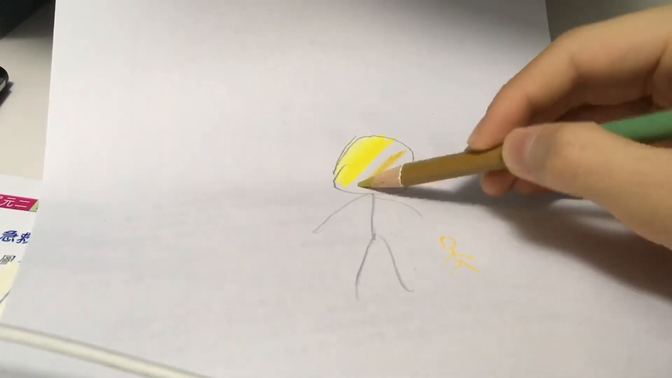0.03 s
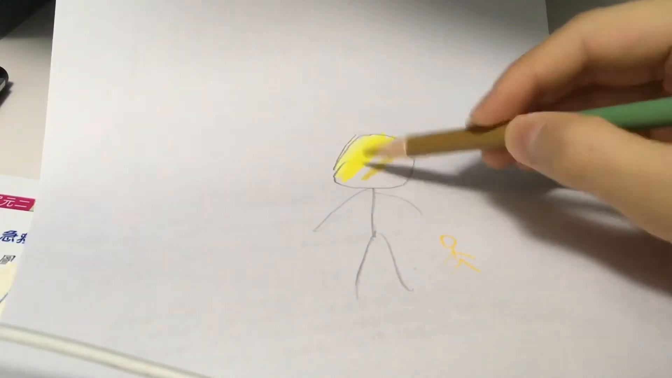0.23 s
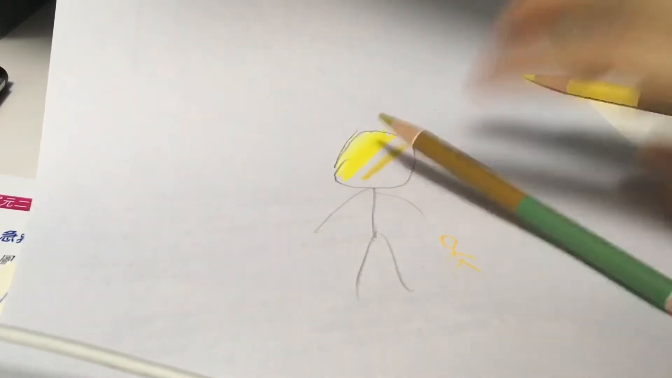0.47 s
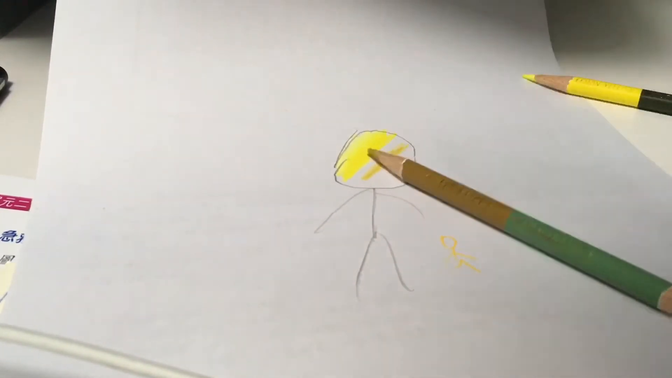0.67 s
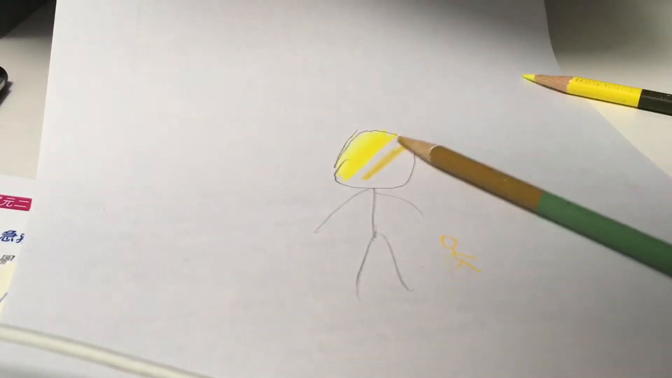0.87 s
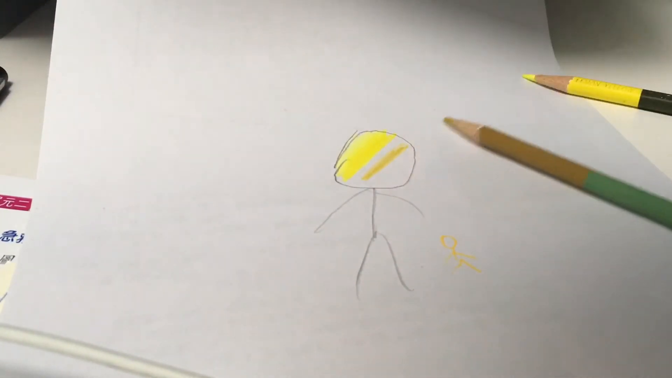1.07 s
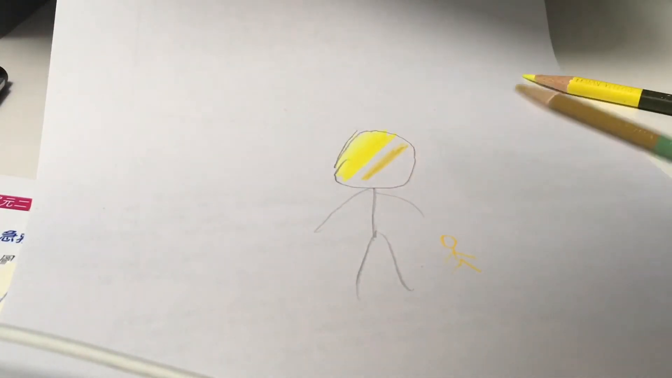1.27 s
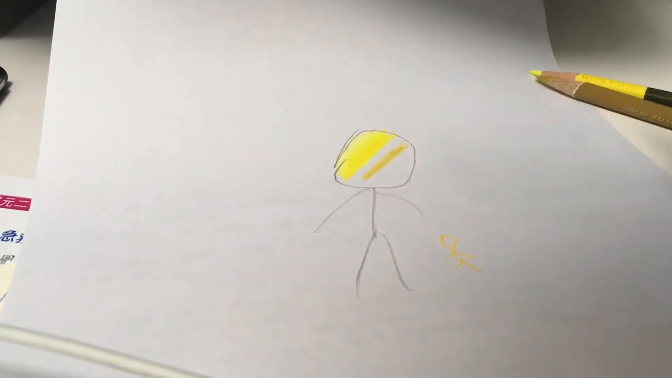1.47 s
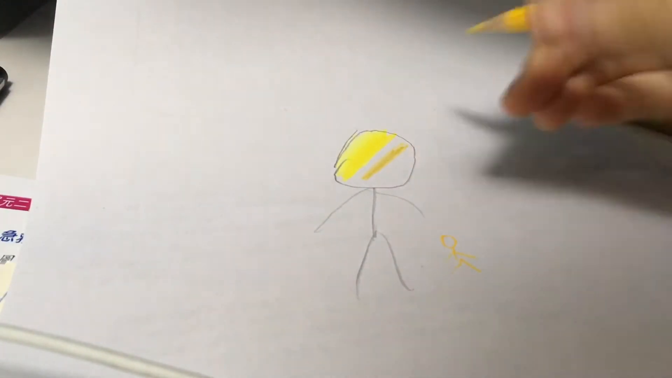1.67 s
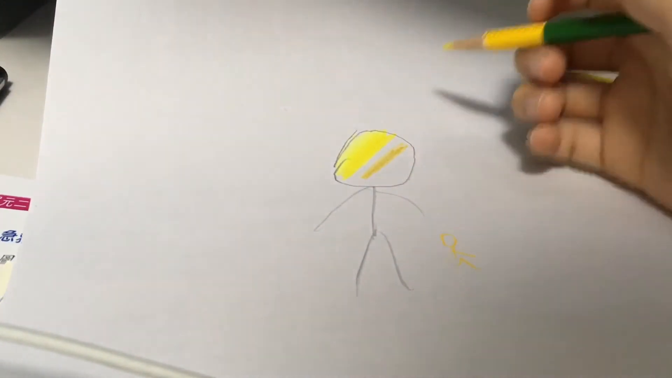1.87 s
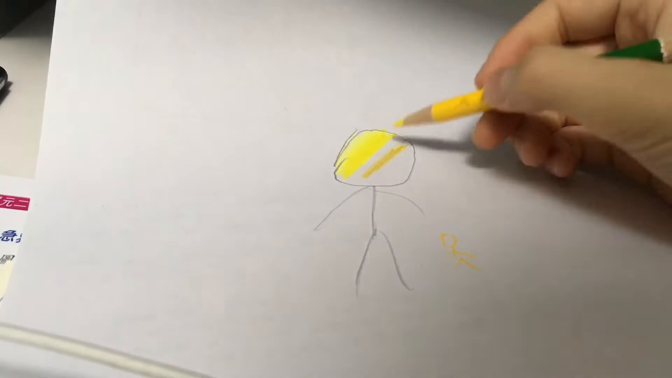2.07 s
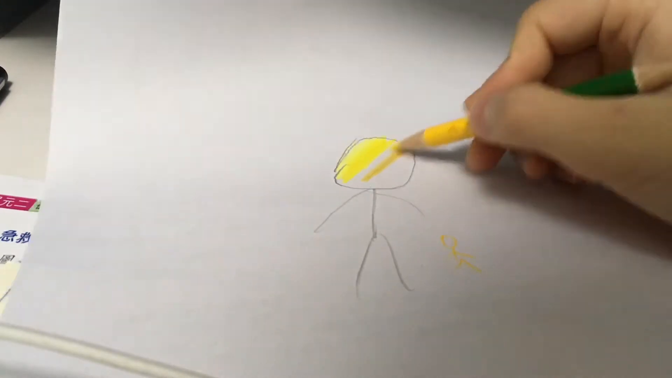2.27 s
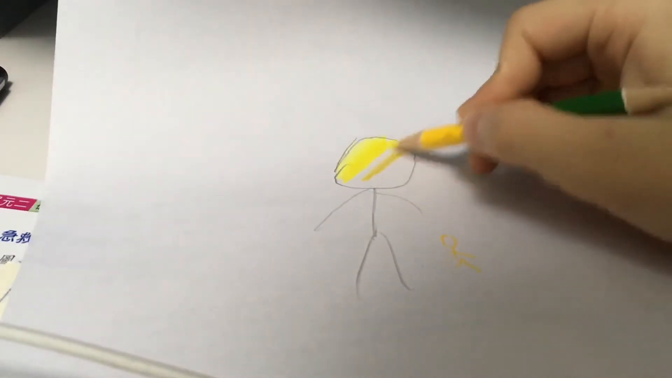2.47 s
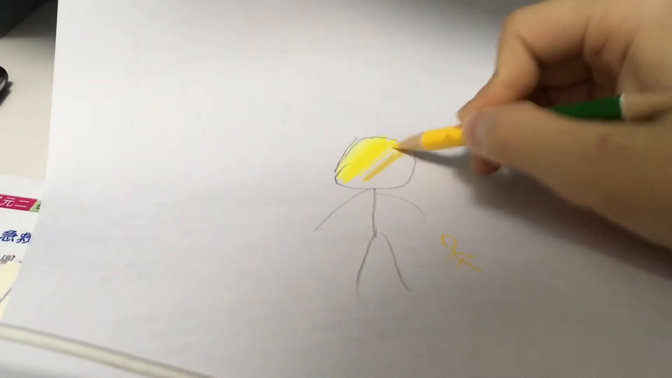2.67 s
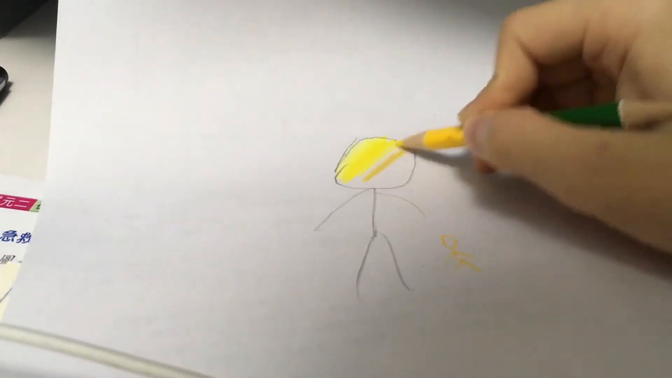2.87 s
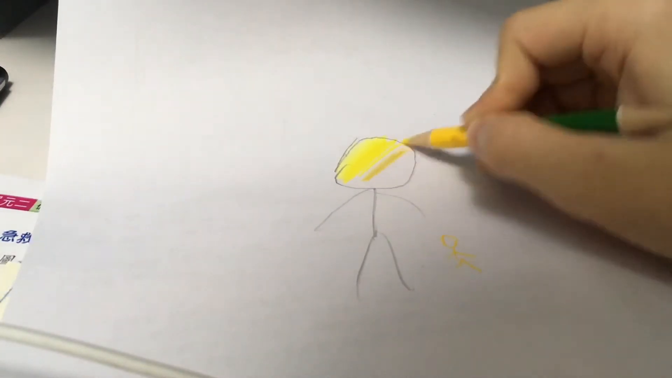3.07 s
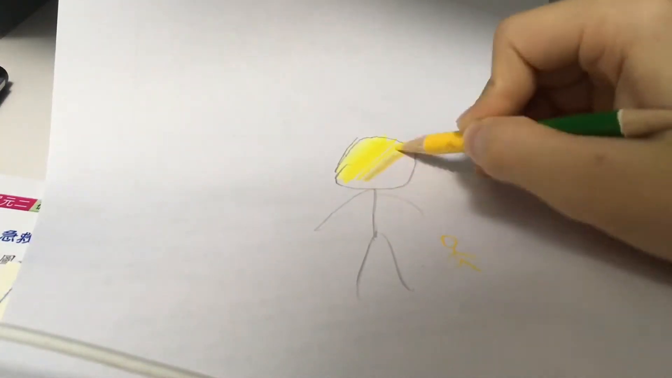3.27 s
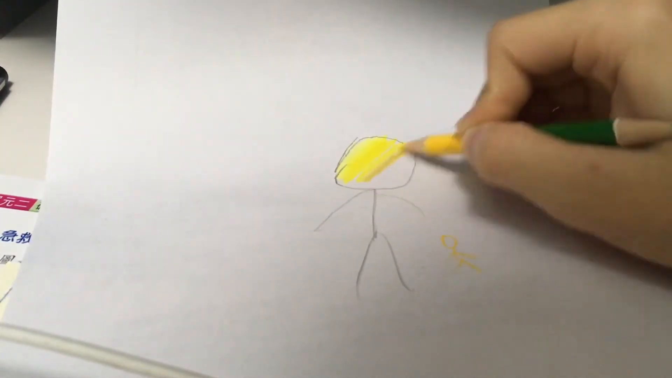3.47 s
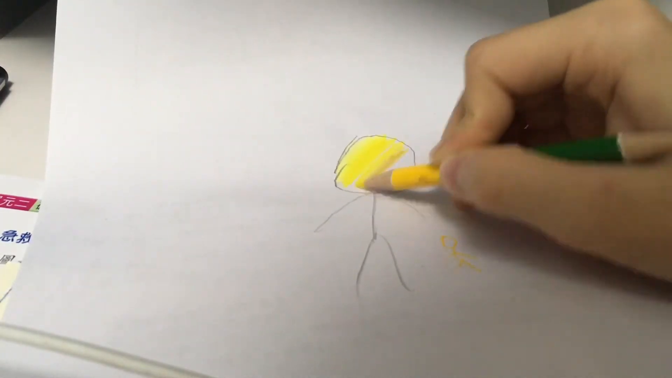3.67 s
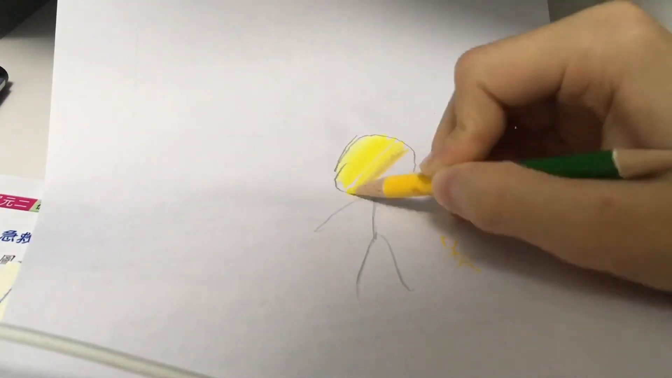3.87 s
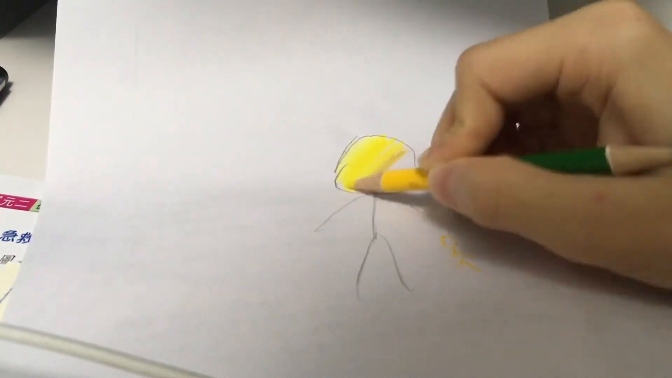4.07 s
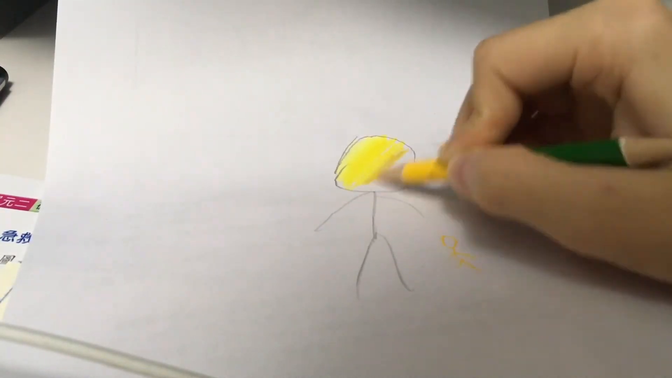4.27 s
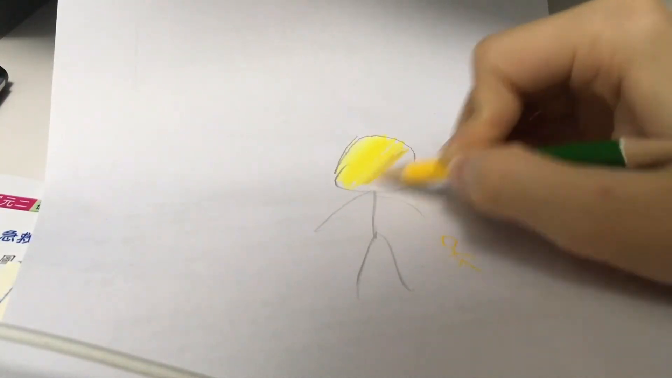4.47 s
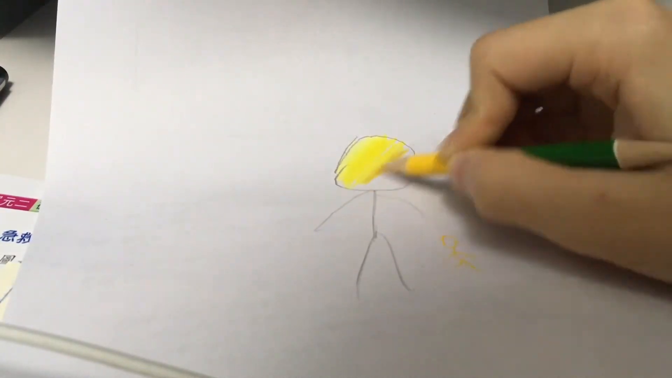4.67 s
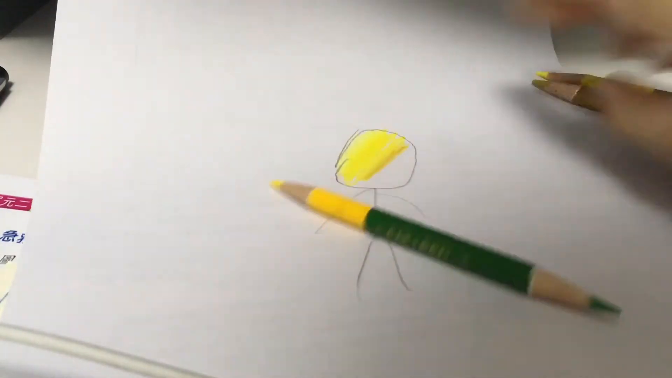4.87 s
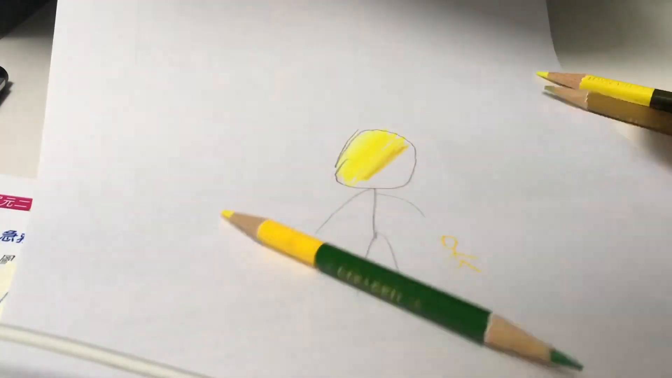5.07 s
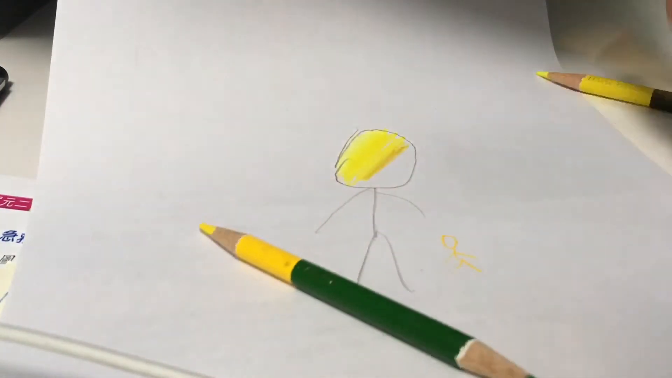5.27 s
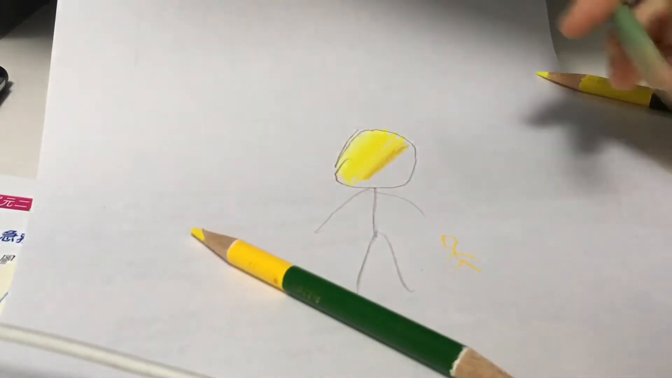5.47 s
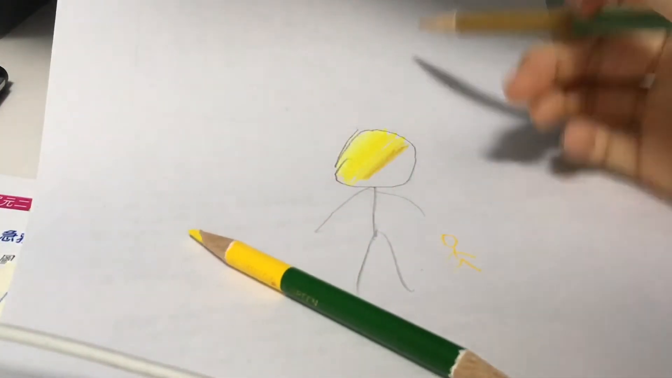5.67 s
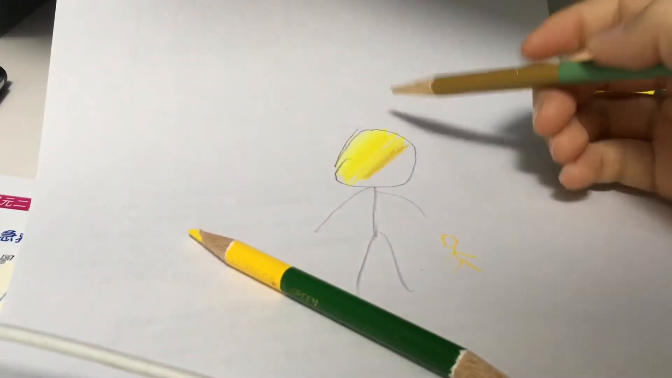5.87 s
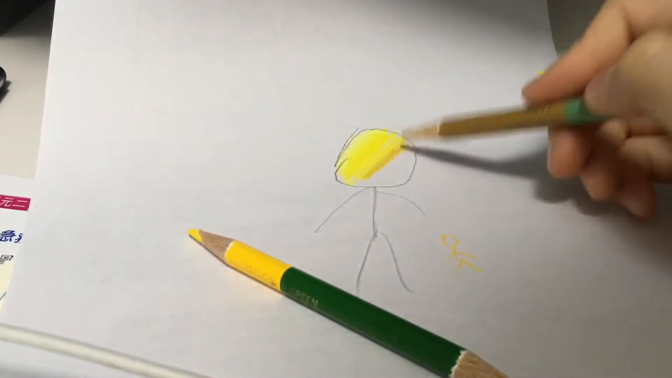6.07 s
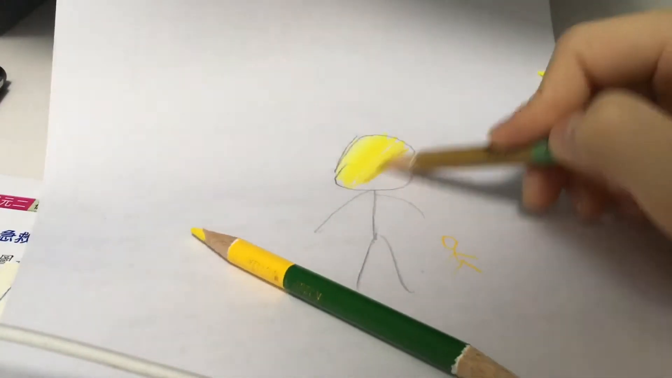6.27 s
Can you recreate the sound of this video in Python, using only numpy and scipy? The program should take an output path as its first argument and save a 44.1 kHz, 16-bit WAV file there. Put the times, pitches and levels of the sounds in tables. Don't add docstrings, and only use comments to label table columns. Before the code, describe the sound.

Brief pencil flicks, hard wooden clacks and rolling, brisk back-and-forth colouring strokes, then another pencil clatter and two final rubs, above dull room hum.

```python
import sys
import numpy as np
from scipy import signal
from scipy.fft import rfft, irfft, next_fast_len
from scipy.io import wavfile

SR = 44100
rng = np.random.default_rng(int(sys.argv[2]) if len(sys.argv) > 2 else 0)


def wav_record(signal):
    frames = np.transpose(np.atleast_2d(signal))
    bounded = np.clip(frames, -1, 1)
    quanta = np.round(bounded * 32767).astype(np.int16)
    wavfile.write(sys.argv[1], SR, quanta)


def convert_level_to_amplitude(level_db):
    exponent = np.asarray(level_db, float) / 20
    return 10 ** exponent


N = 278922

# (frequency [Hz], density [dB per Hz])
RUMBLE = [(15, -62), (25, -51), (40, -16), (53, -12), (108, -3.5), (195, -1.5), (217, -4.5), (238, -11.5),
          (282, -5), (324, -23), (448, -25), (477, -30.5), (565, -38.5), (659, -32.5), (1000, -59),
          (1300, -100), (2200, -120)]
# (frequency [Hz], density [dB per Hz])
ROOM_HISS = [(470, -46.5), (800, -7.5), (1190, -0.5), (1660, -7), (2290, -8), (3140, -13.5), (7360, -18),
             (9100, -22.5), (13900, -28.5), (16000, -54)]
# (frequency [Hz], density [dB per Hz])
SKIN = [(1530, -58.5), (2600, -4), (4460, 0.5), (5230, -2), (5690, 1.5), (6190, -3.5), (9120, 2),
        (16000, -15)]
# (start [s], length [s], hiss [dB], body over hiss [dB])
SLIDES = [(0.21, 0.082, -75.5, 8), (0.26, 0.047, -67.5, -3), (0.295, 0.098, -73.5, 5),
          (0.36, 0.11, -57.5, 0), (0.51, 0.037, -62.5, 14.5), (0.56, 0.21, -76, -2), (1.45, 0.014, -72, -1),
          (1.56, 0.022, -76, -16), (1.785, 0.051, -69, 5.5), (1.94, 0.13, -82, 8.5),
          (2.225, 0.037, -72, 10), (4.7, 0.11, -50.5, -2.5), (5.222, 0.013, -77.5, 8)]
# (start [s], length [s], hiss [dB], body over hiss [dB])
GRABS = [
    (1.857, 0.1, -67, 1),
    (4.82, 0.034, -64, -7),
    (4.84, 0.18, -79, 10),
    (5.5, 0.16, -79, -20),
    (5.64, 0.042, -66.5, 1),
    (5.688, 0.077, -64, 3),
    (5.76, 0.25, -72.5, -3),
]
# (start [s], length [s], scrape [dB], body over scrape [dB])
ROLLS = [(0.43, 0.044, -59, 14), (0.75, 0.056, -75, 21), (0.895, 0.026, -65, 14), (0.98, 0.052, -59, 6.2),
         (1.06, 0.058, -65, 7.3), (1.12, 0.11, -62.5, 3.4), (1.22, 0.11, -66, 15),
         (1.315, 0.1, -67.5, 16.6), (1.37, 0.086, -78.5, 21), (4.79, 0.064, -60, 9),
         (4.912, 0.12, -63.5, 16.4), (5.06, 0.051, -58.5, 9.5), (5.11, 0.075, -76.5, 13),
         (6.082, 0.086, -72.5, 9.9)]
# (frequency [Hz], width [Hz], level [dB])
RATTLE = [(429, 120, 6), (1050, 320, 3), (1670, 305, 7), (1980, 570, 2), (2470, 260, 1.5)]
# (frequency [Hz], width [Hz], level [dB])
SCRAPE = [(3290, 240, 4), (4540, 390, 1), (5980, 790, 0), (6950, 1200, -3), (9500, 2500, -3)]
# (start [s], length [s], level [dB], place of top speed [0-1])
SLEEVE = [
    (5.745, .1, -57, .42),
]
# (time [s], peak [dB], pitch [Hz], t60 [s])
LANDINGS = [(.013, -34, 252, 0.061), (.428, -32.5, 251, .1), (.515, -33, 242, 0.046),
            (0.601, -42.5, 194, 0.094), (.758, -27.5, 245.3, 0.26), (.9, -28, 241, 0.21),
            (1.07, -30.5, 238, 0.065), (1.305, -37, 260, 0.18), (4.78, -36.5, 264, 0.089),
            (4.918, -26.5, 222, 0.094), (4.935, -31.5, 242, 0.078), (4.965, -36, 203, .1),
            (5.067, -40.5, 269, 0.16), (5.133, -38, 257, 0.088)]
NUDGES = [2.311, 2.432, 2.534, 3.8, 3.89, 4.232]
# (frequency [Hz], level [dB], t60 [share of the boom's])
BARE_DESK = [(360, -3.5, 0.41), (423, 2, 0.29), (560, -4, 0.3), (722, 1.5, 0.36), (880, -15, .15)]
# (frequency [Hz], level [dB], t60 [share of the boom's])
UNDER_SHEET = [(340, -1, 0.43), (434, -1.5, 0.44), (550, -8, 0.27), (850, -9, .15), (1270, -3, .12)]
# (frequency [Hz], level [dB], t60 [s])
BARREL = [(1040, -1, 0.029), (1318, 4, 0.013), (1670, 3.5, 0.016), (1970, 0.5, 0.049), (2184, 1.5, 0.024),
          (2460, -10, 0.093), (3210, -12.5, 0.12)]
# (time [s], barrel peak [dB], tick peak [dB], loudest barrel pitch [Hz], tick pitch [Hz])
BLOWS = [(0.3845, -43, -53, 945, 6800), (0.4287, -22, -25.5, 1670, 4820), (0.5177, -34, -49, 1280, 4200),
         (0.5302, -48, -44, 1670, 9500), (0.7572, -32, -33, 1980, 8600), (0.8992, -34.5, -48, 1020, 4170),
         (1.0036, -43.5, -49, 1780, 4950), (1.1584, -24.5, -42, 1750, 6460), (1.2134, -40, -46, 2130, 5300),
         (1.2189, -19, -31.5, 1980, 5500), (1.3234, -29.5, -42.5, 2130, 3540),
         (1.3356, -34.5, -41, 1900, 3450), (4.7208, -36.5, -56, 1870, 8820),
         (4.7641, -33.5, -43, 2190, 5740), (4.7814, -25.5, -27, 1480, 4170), (4.9171, -22, -42, 1430, 2920),
         (5.0700, -41, -39.5, 1300, 4730), (5.0715, -58, -43, 2220, 7960)]
# (time [s], barrel peak [dB], barrel pitch [Hz])
TAPS = [(0.405, -46, 902), (0.752, -43, 890), (1.0624, -51, 985), (1.0835, -61, 1960), (2.219, -44.5, 1780),
        (2.3108, -42, 1820), (2.4307, -43, 1050), (4.802, -54, 1310), (4.9107, -49, 2480),
        (4.935, -45, 1150), (4.9804, -43, 1780), (5.6434, -49, 1560), (6.0762, -45, 1600),
        (6.1008, -53, 1270)]
# (time [s], barrel peak [dB], barrel pitch [Hz])
FACETS = [(0.1611, -45.5, 2280), (0.4604, -46, 1240), (1.1681, -32, 1040), (1.1844, -44, 2450),
          (1.2378, -42, 1960), (1.269, -39, 1980), (1.2865, -30, 1920), (1.3024, -37, 996),
          (1.3454, -46, 1670), (1.3602, -49, 1130), (1.377, -43, 1950), (1.3966, -51, 1160),
          (1.411, -45.5, 1670), (1.4308, -54, 2080), (2.2585, -50, 926), (4.966, -35, 1290),
          (5.135, -60, 1020)]
# (time [s], tick peak [dB], tick pitch [Hz])
NAIL_TICKS = [(0.502, -51, 6730), (1.696, -60, 8300), (4.8404, -53, 5930), (5.396, -60.5, 4400),
              (5.628, -59, 10400)]
# (start [s], length [s], hiss [dB])
STROKES = [(0.061, 0.085, -59), (2.257, 0.11, -60.5), (2.368, 0.084, -61), (2.47, 0.082, -55.5),
           (2.579, 0.077, -56.5), (2.687, 0.065, -57.5), (2.781, 0.073, -57.5), (2.879, 0.072, -57.5),
           (2.984, 0.077, -57.5), (3.084, 0.083, -55), (3.195, 0.074, -56.5), (3.304, 0.08, -56),
           (3.417, 0.076, -56), (3.521, 0.092, -57.5), (3.651, 0.074, -58), (3.762, 0.09, -58),
           (3.871, 0.077, -58), (3.985, 0.068, -56.5), (4.087, 0.09, -61), (4.206, 0.07, -60),
           (4.307, 0.069, -55), (4.404, 0.073, -56.5), (4.506, 0.075, -57), (4.606, 0.12, -61),
           (6.127, 0.081, -59), (6.233, 0.081, -60)]
# (start [s], length [s], hiss [dB], body over hiss [dB])
FLICKS = [
    (0, 0.036, -61.5, 9.5),
    (0.157, 0.06, -63, 6.5),
]
# (time [s], body over hiss [dB])
PRESSURE = [
    (0.1, 5.5),
    (2.3, 1.5),
    (2.4, 3.5),
    (3.1, 3.3),
    (3.6, 4),
    (4.15, 1),
    (4.5, 5),
    (6.2, 6.5),
]
# (start [s], length [s], level [dB], place of top speed [0-1])
RESTING_LEAD = [
    (2.24, 2.47, -79, 0.3),
]
# (frequency [Hz], width [Hz], level [dB])
TIP = [(3095, 273, 0.5), (4665, 590, -4), (6500, 370, 0.5), (7860, 510, -2.5), (9280, 770, -2),
       (10160, 610, -3), (11400, 1060, -2.5), (13800, 2800, -9), (14700, 780, -6)]
# (frequency [Hz], width [Hz], level [dB])
HELD_PENCIL = [(403, 198, -1.5), (778, 81, 1.5), (945, 123, -2), (1460, 290, -3), (1780, 180, 1),
               (2338, 140, -1)]
# (frequency [Hz], width [Hz], level [dB])
BOARD = [(140, 36, -2.5), (255, 51, -0.5), (344, 61, -5)]

ON_SHEET_S = 4.6


def level(x, db):
    return x * convert_level_to_amplitude(db) / np.sqrt(np.mean(x ** 2))


def peak_at(x, db):
    return convert_level_to_amplitude(db) * x / np.abs(x).max()


def coloured(x, points):
    hz, db = np.transpose(points)
    size = next_fast_len(N)
    f = np.maximum(np.arange(size // 2 + 1) * SR / size, 1)
    gain = convert_level_to_amplitude(np.interp(np.log(f), np.log(hz), db, left=-80, right=-80))
    return irfft(rfft(x, size) * gain, size)[:N]


def walk(rate):
    steps = rng.standard_normal(int(N / SR * rate) + 2)
    return 1.2 * np.interp(np.arange(N) * rate / SR, np.arange(len(steps)), steps)


def resonate(x, peaks, flicker_db=0., rate=40):
    out = 0
    for k, (hz, width, db) in enumerate(peaks):
        gain = (-1) ** k * convert_level_to_amplitude(db + flicker_db * walk(rate))
        out = out + gain * signal.lfilter(*signal.iirpeak(hz, hz / width, fs=SR), x)
    return level(out, 0)


def ring(modes, t):
    return sum(convert_level_to_amplitude(db) * np.sin(2 * np.pi * hz * t) * np.exp(-np.log(1000) * t / t60)
               for hz, db, t60 in modes)


def grit(per_s, scatter_db):
    hit = rng.random(N) < per_s / SR
    size = convert_level_to_amplitude(scatter_db * np.minimum(rng.exponential(size=N), 3))
    return hit * np.clip(rng.standard_normal(N), -2.5, 2.5) * size


def swell(rows, blunt):
    out = np.zeros(N + SR)
    for start, length, db, peak in rows:
        u = np.linspace(0, 1, int(length * SR))
        bend = np.log(.5) / np.log(peak)
        i = int(start * SR)
        out[i:i + len(u)] += convert_level_to_amplitude(db) * np.abs(np.sin(np.pi * u ** bend)) ** blunt
    return out[:N]


def peaked(rows, peak):
    return [(*row, peak) for row in rows]


def rub(rows, low, high, blunt, body_blunt):
    hiss = swell([(s, n, db, peak) for s, n, db, _, peak in rows], blunt)
    body = swell([(s, n, db + body_db, peak) for s, n, db, body_db, peak in rows], body_blunt)
    return hiss * high + body * low


def background():
    rumble = level(coloured(rng.standard_normal(N), RUMBLE), -50) * convert_level_to_amplitude(0.84 * walk(rate=4.7))
    hiss = level(coloured(rng.standard_normal(N), ROOM_HISS), -75.5) * convert_level_to_amplitude(0.25 * walk(rate=5.0))
    treble = [(8600, 1100, -5.5), (10200, 5200, -8), (12800, 1800, -14)]
    stir = resonate(rng.standard_normal(N), treble, flicker_db=4.0, rate=7.6)
    return rumble + hiss + level(stir, -85.5)


def sleeve():
    cloth = resonate(rng.standard_normal(N), [(600, 120, 0), (950, 60, -5), (420, 90, 0)])
    return swell(SLEEVE, blunt=1.6) * resonate(cloth, [(650, 700, 0)])


def handling():
    skin = level(coloured(grit(per_s=15000, scatter_db=0.5), SKIN), 0) * convert_level_to_amplitude(2.3 * walk(rate=70))
    bumps = grit(per_s=4000, scatter_db=1.1) * convert_level_to_amplitude(1.6 * walk(rate=200))
    rattle = resonate(bumps, RATTLE, flicker_db=4.0, rate=50)
    scrape = resonate(resonate(bumps, SCRAPE), SCRAPE, flicker_db=5.0, rate=40)
    finger_rows = peaked(SLIDES, 0.54) + peaked(GRABS, 0.13)
    fingers = rub(finger_rows, rattle, skin, blunt=0.67, body_blunt=0.91)
    rolling = rub(peaked(ROLLS, 0.25), rattle, scrape, blunt=1.0, body_blunt=1.0)
    return fingers + rolling


def thuds():
    out, t = np.zeros(N + SR), np.arange(SR // 4) / SR
    onset, choke = 1 - np.exp(-t / 0.0011), np.exp(-(t / .05) ** 3)
    nudges = [(s, -39.5, 252, 0.076) for s in NUDGES]
    full_db, upper_per_db = -26, 2.7
    for s, db, hz, t60 in LANDINGS + nudges:
        modes = UNDER_SHEET if s > ON_SHEET_S else BARE_DESK
        upper = ring([(f, g, share * t60) for f, g, share in modes], t)
        boom = ring([(hz, 0, t60)], t) + convert_level_to_amplitude(upper_per_db * (db - full_db)) * upper
        i = int(s * SR)
        out[i:i + len(t)] += convert_level_to_amplitude(db) * boom * onset * choke
    return out[:N]


def contacts():
    taps = [(s, db, db - 6.5, hz, 6050) for s, db, hz in TAPS]
    facets = [(s, db, db - 23, hz, 4000) for s, db, hz in FACETS]
    nails = [(s, db - 10, db, 1100, hz) for s, db, hz in NAIL_TICKS]
    return BLOWS + taps + facets + nails


def barrel_ring(hz, freedom, noise, t):
    modes = []
    for f, db, t60 in BARREL:
        detune, uneven = rng.standard_normal(2)
        off_pitch_db = 12 * abs(np.log2(f / hz))
        modes.append((f * (1 + 0.013 * detune), db + 1.4 * uneven - off_pitch_db, t60 * freedom))
    return signal.fftconvolve(ring(modes, t), noise * t * np.exp(-t / 0.0013))[:len(t)]


def contact_tick(hz, noise, t):
    decay = np.exp(-t / 0.0033) + convert_level_to_amplitude(-14) * np.exp(-t / 0.0037)
    snap = noise * (1 - np.exp(-t / 0.00053)) * decay
    tick = 0.78 * snap + 1.37 * signal.lfilter(*signal.iirpeak(hz, 9.5, fs=SR), snap)
    band = signal.butter(2, [2800, min(2 * hz, 13000)], "bandpass", fs=SR, output="sos")
    return signal.sosfilt(band, tick)


def knocks():
    out, t = np.zeros(N + SR), np.arange(SR // 8) / SR
    for s, db, tick_db, hz, tick_hz in contacts():
        freedom = 0.46 if s > ON_SHEET_S else 0.98
        chatter, snap = rng.standard_normal((2, len(t)))
        barrel = barrel_ring(hz, freedom, chatter, t)
        tick = contact_tick(tick_hz, snap, t)
        i = int(s * SR)
        out[i:i + len(t)] += peak_at(barrel, db) + peak_at(tick, tick_db)
    return out[:N]


def strokes():
    s, db = np.transpose(PRESSURE)
    return [(t, n, hiss_db, np.interp(t, s, db), 0.48 - 3 * (n - 0.058)) for t, n, hiss_db in STROKES]


def shading():
    tip = resonate(grit(per_s=13000, scatter_db=0.8), TIP, flicker_db=1.5, rate=45)
    slips = grit(per_s=4000, scatter_db=1.33)
    body = resonate(slips, HELD_PENCIL, flicker_db=2.5, rate=60)
    board = resonate(resonate(slips, BOARD), BOARD, flicker_db=4.0, rate=30)
    rows = strokes() + peaked(FLICKS, 0.14)
    rubbed = rub(rows, body, tip, blunt=.5, body_blunt=.8)
    board_db = 7
    hum = swell([(s, n, db + board_db, peak) for s, n, db, _, peak in rows], blunt=0.73) * board
    return rubbed + hum + swell(RESTING_LEAD, blunt=0.2) * body


def room(x, t60_s, wet_db):
    t = np.arange(SR // 3) / SR
    tail = rng.standard_normal(len(t)) * np.exp(-np.log(1000) * t / t60_s)
    tail = level(tail, 0) / np.sqrt(len(t))
    return x + convert_level_to_amplitude(wet_db) * signal.fftconvolve(x, tail)[:N]


def scene():
    desk = sleeve() + handling() + thuds() + knocks() + shading()
    return (room(desk, t60_s=0.12, wet_db=-10.5) + background())[None]


def top_cut(x):
    return signal.sosfilt(signal.butter(12, 16380, fs=SR, output="sos"), x)


def record(dry):
    low_pass = signal.ellip(10, .2, 60, 15750, fs=SR, output="sos")
    mix = signal.sosfilt(low_pass, dry)
    return top_cut(mix)


dry = scene()
out = record(dry)
wav_record(out)
```